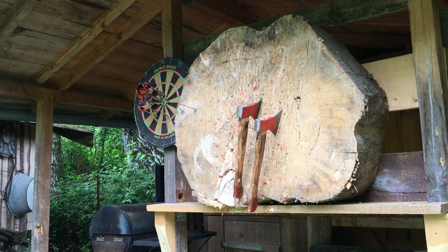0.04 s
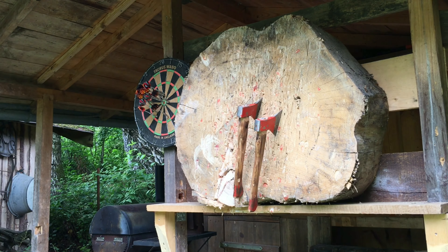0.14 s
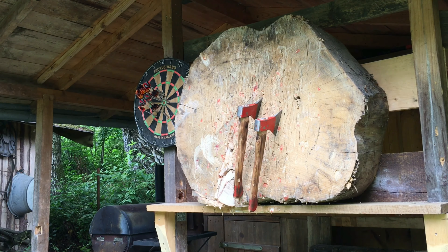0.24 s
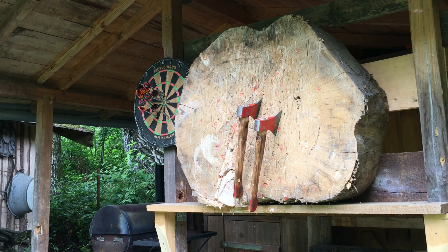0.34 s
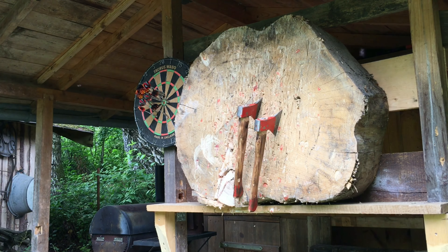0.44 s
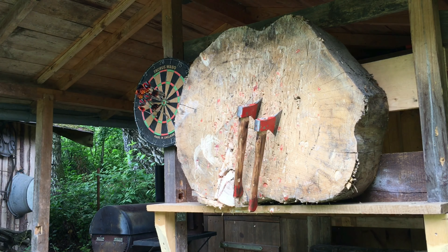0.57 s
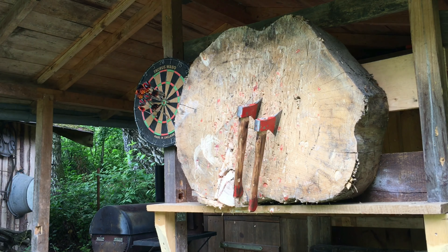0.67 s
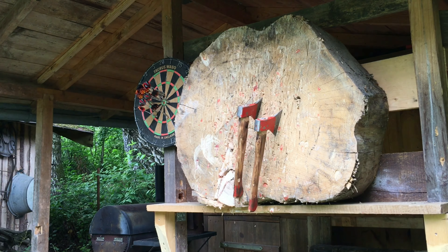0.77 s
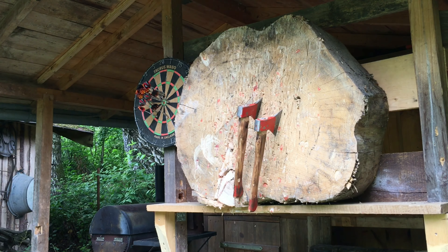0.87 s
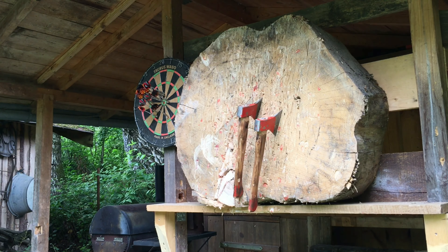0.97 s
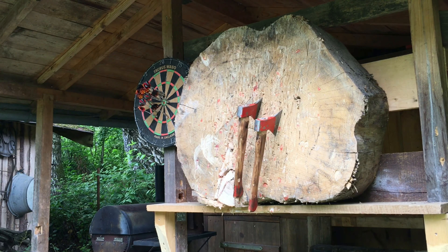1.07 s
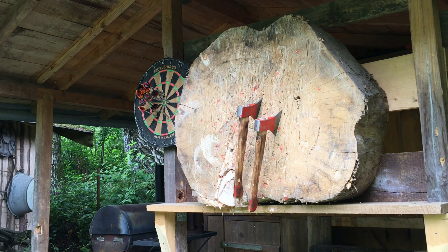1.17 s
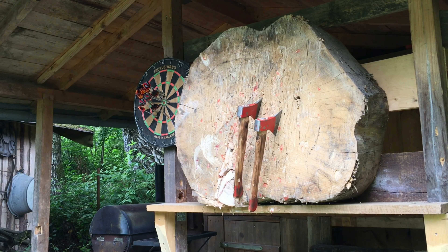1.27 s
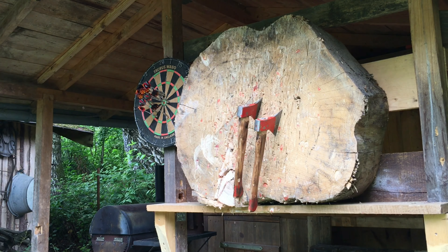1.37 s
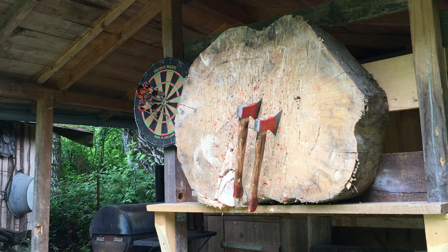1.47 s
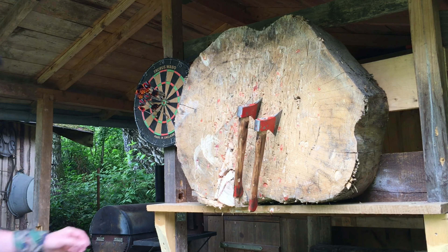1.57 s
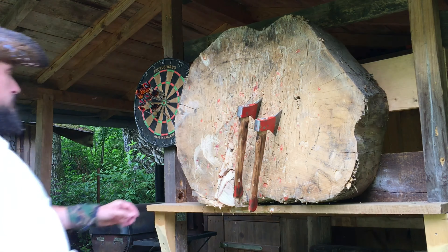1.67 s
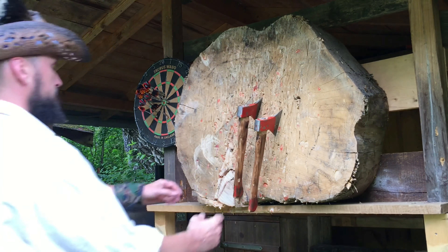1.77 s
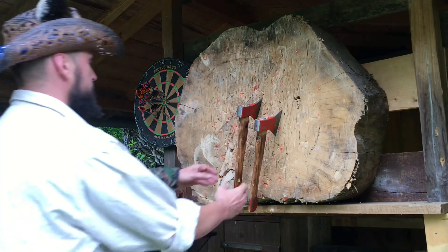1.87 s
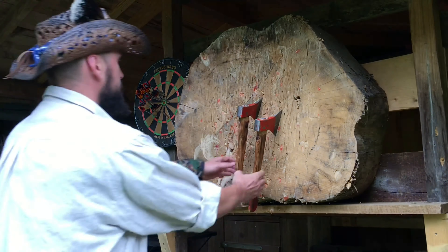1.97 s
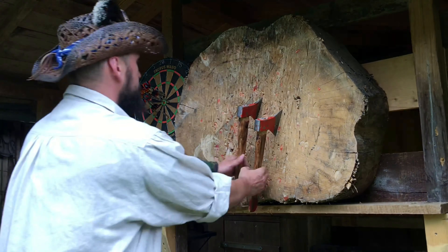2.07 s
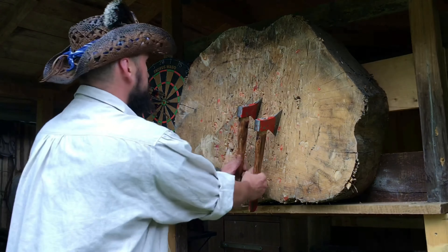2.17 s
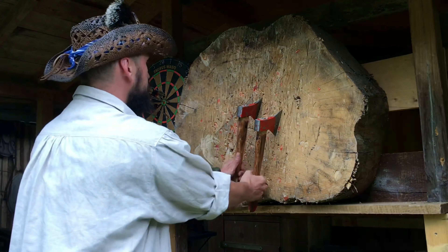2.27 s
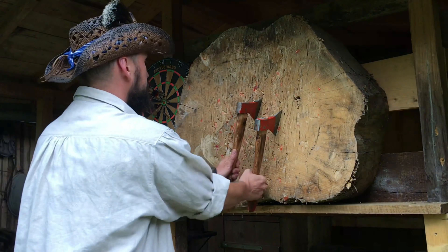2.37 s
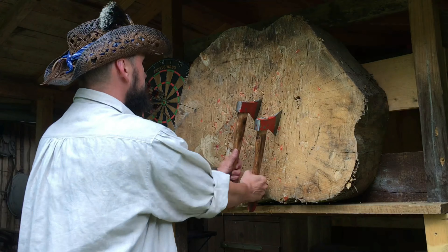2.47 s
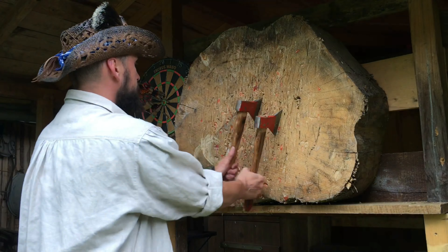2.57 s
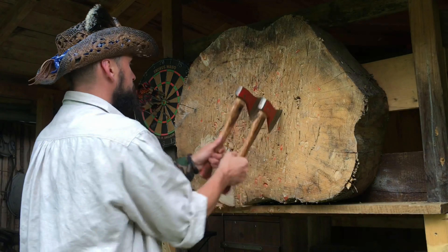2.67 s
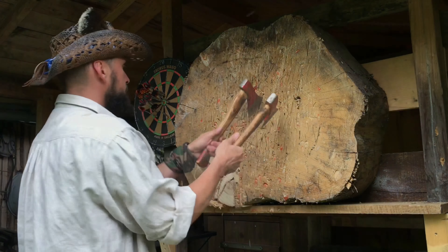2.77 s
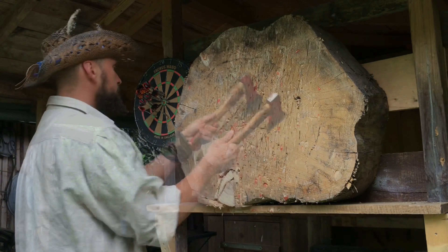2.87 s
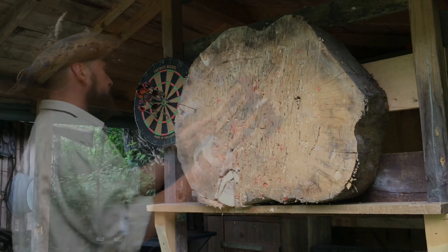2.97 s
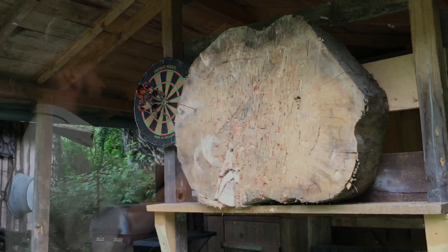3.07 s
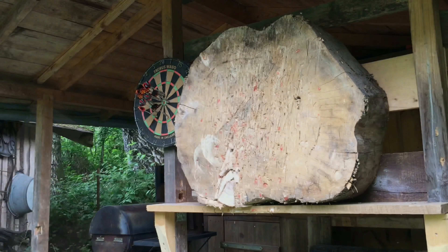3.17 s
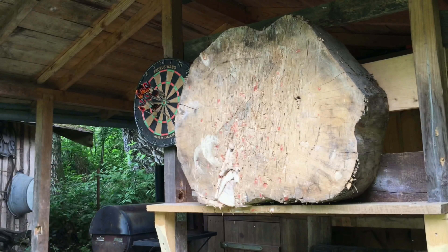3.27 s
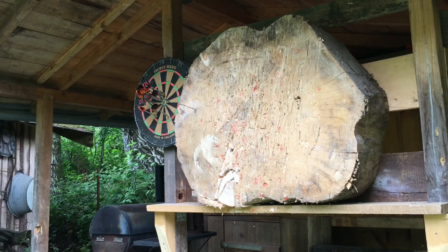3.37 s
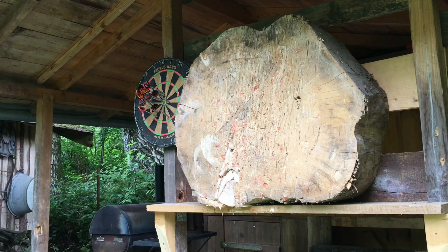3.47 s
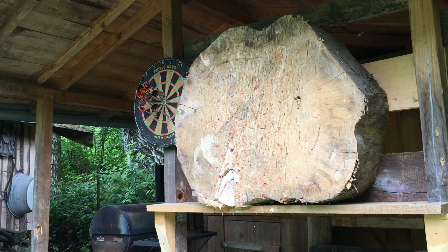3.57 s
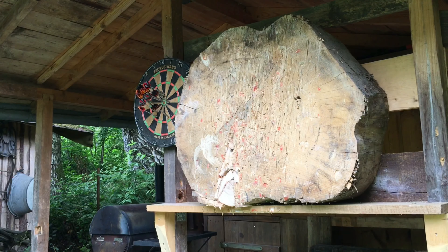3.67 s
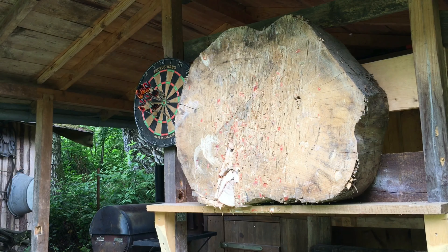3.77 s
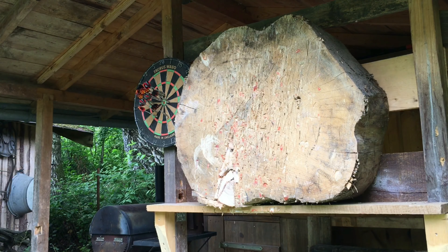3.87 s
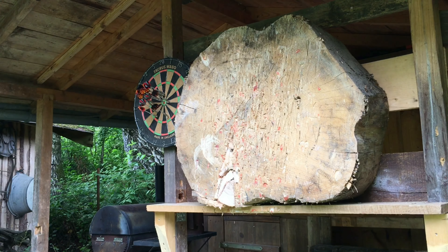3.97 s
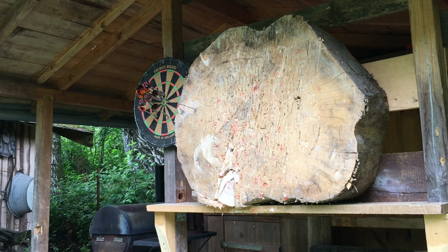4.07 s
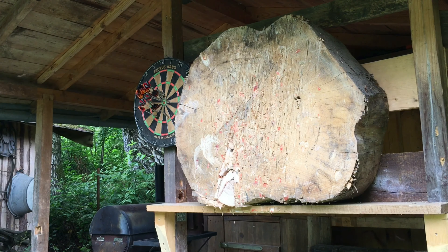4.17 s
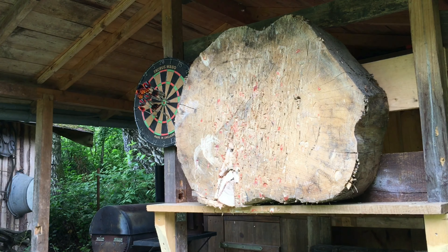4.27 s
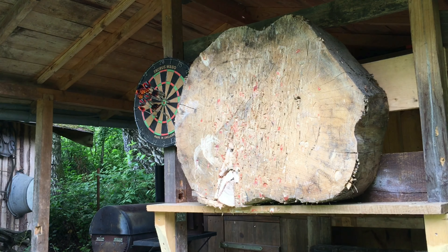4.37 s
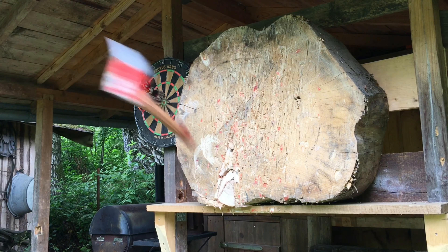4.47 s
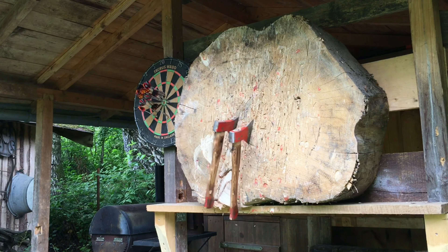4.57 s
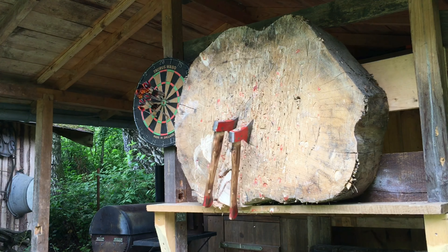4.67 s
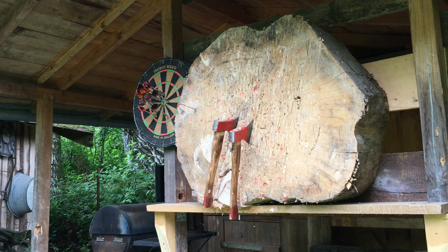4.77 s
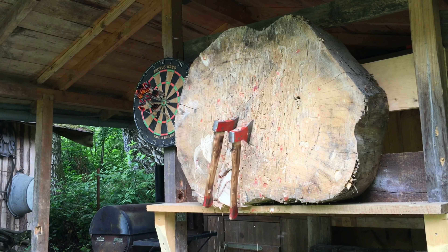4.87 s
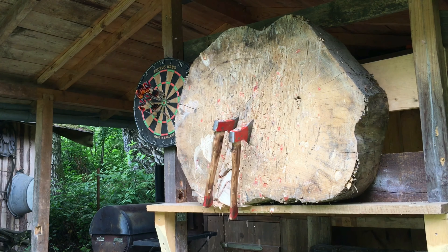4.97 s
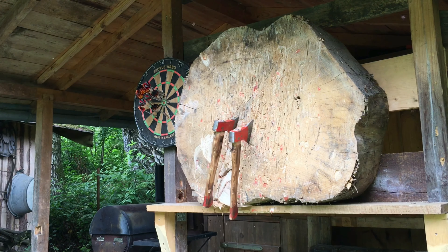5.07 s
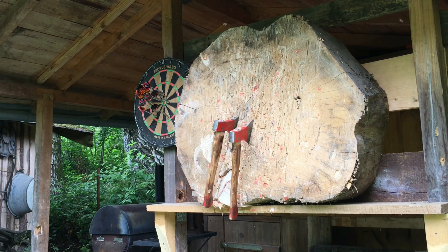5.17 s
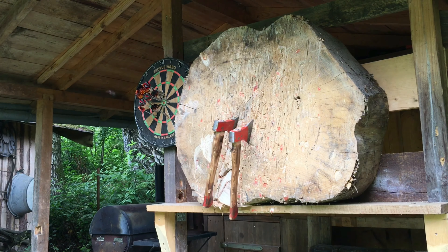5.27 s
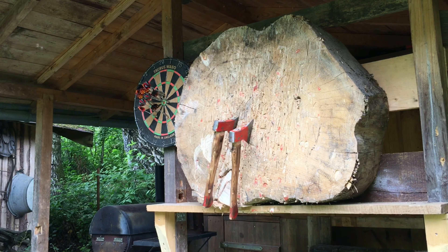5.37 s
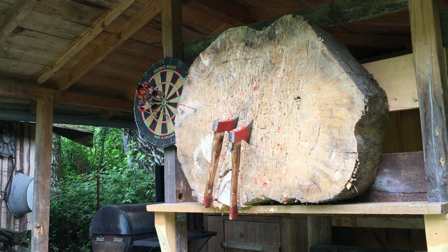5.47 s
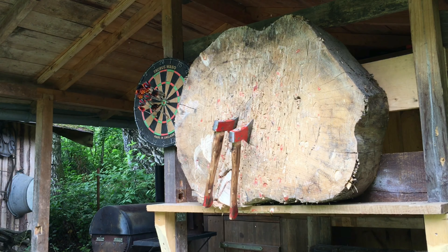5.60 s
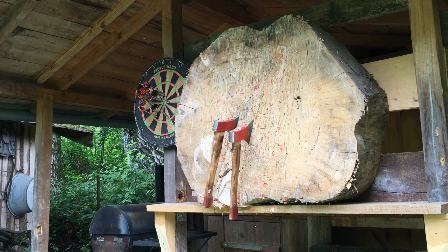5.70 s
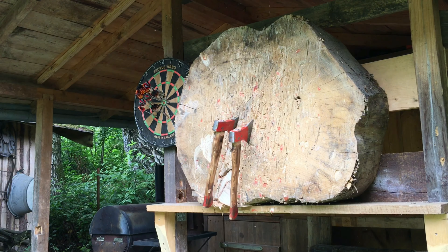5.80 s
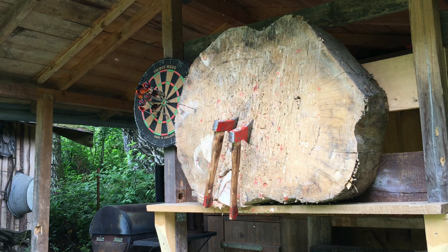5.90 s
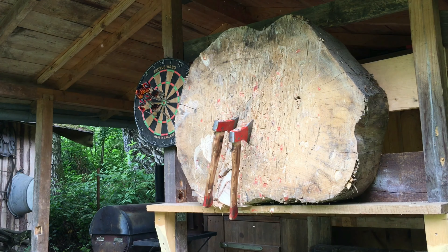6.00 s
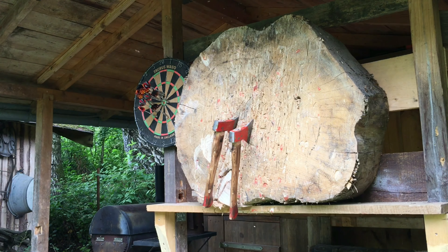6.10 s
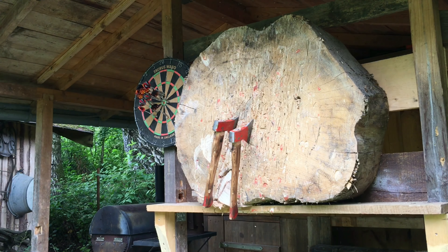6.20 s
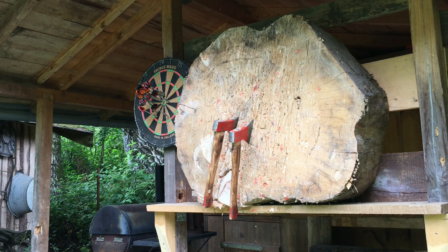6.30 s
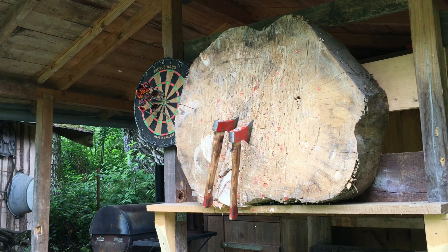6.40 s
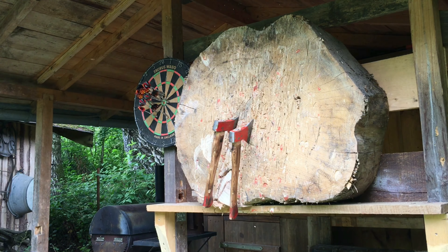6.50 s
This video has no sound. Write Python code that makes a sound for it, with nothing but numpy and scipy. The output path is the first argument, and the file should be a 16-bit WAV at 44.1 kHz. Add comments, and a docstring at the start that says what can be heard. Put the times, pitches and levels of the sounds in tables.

```python
"""Two thrown axes bite into a log slice under an open wooden shelter in a garden. First someone walks up, with
rustles and small ticks, and pulls the axes out; then birds whistle in the trees. A low rush of air leads to the
blow: sharp cracks of noise set the log's tones ringing, the stand booms and creaks as it rocks, and the
quivering handles give puffs of rubbing noise. Birds sing again and a small steel part clinks near the end. All
along lie a low far rumble, a low drone and a faint whine."""
import sys
import numpy as np
from scipy import signal
from scipy.fft import rfft, irfft
from scipy.io import wavfile

SR = 44100
rng = np.random.default_rng(int(sys.argv[2]) if len(sys.argv) > 2 else 0)


def wrap_up_sound(samples):
    """Save the sound to the file named by the first command line argument, as 16-bit audio."""
    columns = np.atleast_2d(samples).T
    # keep every value between -1 and 1, then stretch to whole-number steps
    tamed = np.clip(columns, -1, 1)
    steps = np.round(tamed * 32767).astype(np.int16)
    wavfile.write(sys.argv[1], SR, steps)


N = 288546   # length of the scene in samples


def from_db(db):
    """Turn decibels into a plain gain."""
    return 10 ** (np.asarray(db) / 20)


def rms_one(x):
    """Scale a signal to an rms of 1."""
    return x / np.sqrt(np.mean(x ** 2) + 1e-20)


def at_hz(points, hz):
    """Read a table between its points, along a logarithmic pitch axis."""
    points = np.array(points)
    return np.interp(np.log(hz + 1), np.log(points[:, 0]), points[:, 1])


def coloured(x, spectrum, above_hz=0):
    """Shape a noise by a spectrum; what lies above above_hz has rms 1."""
    hz = np.fft.rfftfreq(len(x), 1 / SR)
    shaped = rfft(x) * from_db(at_hz(spectrum, hz))
    upper_part = irfft(shaped * (hz >= above_hz), len(x))
    return irfft(shaped, len(x)) / np.std(upper_part)


def band_pass(x, low_hz, high_hz):
    """Keep the part of a sound between two pitches."""
    return signal.sosfilt(signal.butter(2, [low_hz, high_hz], "band", fs=SR, output="sos"), x)


def ring(clicks, hz, t60):
    """A unit click sets a sine of height 1 ringing; it loses 60 dB in t60 seconds."""
    r = from_db(-60 / (t60 * SR))
    w = 2 * np.pi * hz / SR
    return signal.lfilter([0, np.sin(w)], [1, -2 * r * np.cos(w), r * r], clicks + 1e-18)


def waver(hz, width_hz, db):
    """A tone that is not quite steady: noise in a narrow resonance."""
    t60 = np.log(1000) / np.pi / width_hz
    return from_db(db) * rms_one(ring(rng.standard_normal(N), hz, t60))


def grainy(spread_db, per_s):
    """Noise whose level jumps from grain to grain."""
    grain = (np.arange(N) * per_s / SR).astype(int)
    level_db = spread_db * rng.standard_normal(N)[grain]
    return rng.standard_normal(N) * from_db(level_db)


def add(out, s, piece):
    """Mix a piece into a track from second s on."""
    i = round(s * SR)
    out[i:i + len(piece)] += piece[:N - i]


def puff(attack_s, decay_s):
    """An envelope of height 1 that swells and dies."""
    t = np.arange(SR // 4) / SR
    shape = (1 - np.exp(-t / attack_s)) * np.exp(-t / decay_s)
    return shape / shape.max()


def swell(s, rise_s, fall_s):
    """A gain that climbs to 1 at s and sinks again, both at a steady rate in dB, down to -120 dB."""
    t = np.arange(N) / SR - s
    return from_db(np.maximum(20 * np.minimum(t / rise_s, -t / fall_s), -120))


def together(gains):
    """Unrelated noises add in power."""
    return np.sqrt(sum(g ** 2 for g in gains))


def echoes(x, t60s, build_s):
    """Dense reflections: noise in half-octave bands, each dying at its own rate; energy 1."""
    t = np.arange(SR // 2) / SR
    tail = 0
    edges = 60 * 2 ** np.arange(0, 8.6, .5)
    for low, high in zip(edges, edges[1:]):
        band = band_pass(rng.standard_normal(len(t)), low, high)
        tail = tail + band * from_db(-60 * t / at_hz(t60s, np.sqrt(low * high)))
    tail = tail * (1 - np.exp(-t / build_s))
    return signal.fftconvolve(x, tail / np.sqrt(np.sum(tail ** 2)))[:N]


# colour of the far rumble and air: (pitch [Hz], relative level [dB])
AIR_COLOUR = [(15, -54), (25, -21), (36, -4), (60, 1), (80, -6.5), (226, -19.5), (330, -26.5), (378, -28),
              (617, -33), (726, -34.5), (809, -32.5), (2750, -42.5), (4240, -42.5), (14800, -54.5),
              (16500, -69)]
# a low steady drone: (pitch [Hz], rms level [dB])
LOW_DRONE = [(53.8, -54.5), (145.3, -66)]
AIR_DB = -52   # rms
WHINE_HZ, WHINE_DB = 627, -72.5


def garden():
    """Far rumble and air as shaped noise, a wavering low drone and a thin whine with a drifting phase."""
    air = from_db(AIR_DB) * coloured(rng.standard_normal(N), AIR_COLOUR)
    phase_drift = 1.5 * waver(1.8, 1.5, 0)
    whine = from_db(WHINE_DB) * np.sin(2 * np.pi * WHINE_HZ * np.arange(N) / SR + phase_drift)
    drone = sum(waver(hz, 2.2, db) for hz, db in LOW_DRONE)
    return air + drone + whine


# bird notes: (time [s], length [s], start pitch [Hz], end pitch [Hz], level [dB], hoarseness [Hz])
BIRD_NOTES = [(2.733, 0.045, 8550, 8550, -72, 20), (2.74, 0.05, 5040, 4950, -74, 20),
              (2.785, .03, 4700, 4400, -72, 150), (2.925, 0.073, 4310, 2900, -67, 390),
              (3.075, 0.094, 6060, 4600, -77, 200), (3.195, 0.029, 8920, 8850, -80, 23),
              (3.202, 0.21, 3190, 3290, -86, 140), (3.491, 0.093, 3860, 3300, -77, 500),
              (3.468, 0.056, 8100, 8400, -83, 220), (3.578, 0.062, 7100, 6720, -72.5, 130),
              (3.59, 0.17, 8050, 7700, -81, 140), (3.67, 0.087, 4710, 4855, -69.5, 73),
              (3.986, .1, 3940, 3970, -72.5, 115), (4.075, 0.15, 4400, 4200, -72, 220),
              (4.26, 0.076, 6500, 6450, -76.5, 170), (5.138, .036, 3500, 7160, -59, 260),
              (5.151, 0.037, 3250, 6340, -47.5, 45), (5.172, 0.026, 2800, 6320, -58, 150),
              (6.131, 0.048, 3300, 6430, -61.5, 690), (6.166, 0.043, 4520, 6770, -54.5, 450),
              (6.258, .04, 3540, 5600, -57, 600), (6.275, .05, 4200, 6220, -61, 610),
              (6.432, 0.036, 3280, 5200, -61.5, 630), (6.449, 0.052, 4000, 6120, -61, 503),
              (5.14, 0.036, 6600, 9500, -60.5, 900), (5.141, .04, 2380, 3000, -67, 214)]
OVERTONE_DB, TREES_T60_S, TREES_DB = -26.5, .35, 1


def birds():
    """Whistles whose glide slows towards its end, smeared by the trees."""
    out = np.zeros(N)
    wobble = rms_one(signal.lfilter([1], [1, -.97], rng.standard_normal((len(BIRD_NOTES), SR // 4))))
    for (s, length, start_hz, end_hz, db, hoarse_hz), shake in zip(BIRD_NOTES, wobble):
        u = np.linspace(0, 1, round(length * SR))   # 0 to 1 through the note
        glide_hz = start_hz + (end_hz - start_hz) * np.sin(u * np.pi / 2)
        hz = glide_hz + hoarse_hz * shake[:len(u)]
        phase = 2 * np.pi * np.cumsum(hz) / SR
        lateness = 1 + 0.36 * abs(end_hz - start_hz) / 1000   # wide sweeps are loudest nearer their end
        loudness = np.sin(np.pi * u ** lateness) ** 0.29
        whistle = np.sin(phase) + from_db(OVERTONE_DB) * np.sin(2 * phase)
        add(out, s, from_db(db) * loudness * whistle)
    trees = echoes(out, [(100, TREES_T60_S), (9000, TREES_T60_S)], build_s=0.0046)
    return out + from_db(TREES_DB) * trees


# steps, cloth and hands: (loudest time [s], time to gain 20 dB [s], time to lose 20 dB [s],
# crisp level [dB], middle level [dB], dull level [dB])
MOVES = [(.03, .1, .3, -78, -80, -80), (.18, .2, .15, -80, -68, -73), (.436, .12, .06, -80, -69, -68),
         (.645, .06, .25, -71, -67, -74), (.762, .1, .07, -64, -66, -74), (.96, .15, .2, -74, -68, -72),
         (1.1, .01, .06, -71, -61, -68), (1.325, .04, .3, -74, -73, -73), (1.59, .05, .06, -68, -71, -73),
         (1.625, .02, .3, -74, -70, -65), (1.85, .02, .05, -82, -68, -69), (2.11, .4, .3, -72, -75, -71),
         (2.23, .2, .03, -73, -80, -80), (2.256, .015, .03, -64, -62, -59),
         (2.333, .02, .11, -63, -50, -47), (2.52, .15, .04, -70, -75, -79),
         (2.585, .015, .11, -70, -56, -51), (2.63, .05, .4, -69, -74, -70),
         (2.748, .02, .03, -71, -70, -70), (3.893, .01, .15, -73, -66, -69), (4.02, .2, .3, -81, -74, -76),
         (4.195, .08, .07, -64, -63, -67), (4.43, .2, .3, -95, -67, -58), (5.06, .1, .12, -70, -73, -60),
         (5.17, .08, .2, -70, -68, -64), (5.36, .02, .1, -71, -81, -75), (5.91, .02, .06, -79, -72, -80),
         (6.25, .08, .3, -72, -70, -72)]
# colours of the crisp, middle and dull parts: (pitch [Hz], relative level [dB])
LEAVES_COLOUR = [(2060, -26), (3500, -0.5), (4840, -1.5), (5810, 0), (11900, -2), (15400, -6.5),
                 (16200, -14), (16500, -40)]
CLOTH_COLOUR = [(900, -22), (1300, -2), (2000, -1), (3300, -10.5), (4800, -23)]
SCUFF_COLOUR = [(120, -50), (220, -1.5), (550, -1.5), (1100, -6.5), (1600, -30)]
# a quiet stir while someone is near, then a short fade: crisp, middle and dull levels
MOVING_UNTIL_S, MOVING_DB = 2.72, (-86, -79, -81)


def rustle():
    """Many small rubs: crisp grains above, a brushing in the middle, a dull scuff below."""
    near = np.clip((MOVING_UNTIL_S - np.arange(N) / SR) / .15 + 1, 0, 1)
    moves = [from_db(db)[:, None] * swell(s, rise_s, fall_s) for s, rise_s, fall_s, *db in MOVES]
    stir = from_db(MOVING_DB)[:, None] * near
    crisp, brush, dull = together(moves + [stir])
    out = crisp * coloured(grainy(2.7, 700), LEAVES_COLOUR, above_hz=9400)
    out = out + brush * coloured(grainy(2.5, 400), CLOTH_COLOUR)
    return out + dull * coloured(grainy(2.4, 200), SCUFF_COLOUR)


# small ticks and snaps of wood, twigs and steel:
# (time [s], ring level [dB], ring pitch [Hz], t60 of the lowest partial [s], level of the noise fed to the snap [dB])
SMALL_TICKS = [(.385, -50, 1210, 0.018, -75), (.432, -58, 1500, .012, -70), (.614, -70, 9000, .008, -54),
               (0.638, -60, 1540, 0.0087, -48), (0.984, -50, 1660, 0.015, -61), (1.057, -53, 880, .02, -65),
               (1.092, -39.5, 1130, 0.023, -42), (1.316, -53, 1620, 0.0074, -49.5),
               (1.618, -51, 696, .012, -52), (1.829, -37, 1290, 0.014, -70),
               (2.254, -49.5, 1170, 0.019, -48), (2.307, -50, 1510, 0.026, -62),
               (2.313, -41, 1320, 0.023, -45), (2.319, -34.5, 940, 0.022, -45),
               (2.3263, -33.5, 474, 0.065, -21.5), (2.327, -26.5, 3430, 0.0076, -42),
               (2.572, -42, 520, 0.052, -38.5), (2.617, -52, 12000, .008, -56),
               (2.747, -52.5, 3110, 0.026, -68), (3.079, -62, 5960, 0.0097, -58),
               (3.892, -62, 910, .015, -58), (4.168, -50, 2290, 0.015, -52),
               (5.011, -53.5, 2500, 0.046, -66), (5.022, -56, 2900, 0.045, -67),
               (5.035, -55, 2210, .04, -68), (2.593, -45, 1310, 0.013, -56),
               (5.227, -40, 9000, 0.0057, -46)]
# partials of each tick: (multiple of the ring pitch [1], level against the ring level [dB])
PARTIALS = [(1, 1.5), (1.75, -5.5), (2.4, -5), (4.3, -10)]


def ticks():
    """A short, rough ring whose upper partials die faster, plus a bright snap."""
    out = np.zeros(N)
    t = np.arange(SR // 8) / SR
    noise = rng.standard_normal((len(SMALL_TICKS), len(t)))
    snaps = band_pass(noise, 2500, 11000)
    for (s, db, hz, t60, snap_db), snap, rough in zip(SMALL_TICKS, snaps, noise):
        phase = 2 * np.pi * hz * t + 0.38 * np.cumsum(rough) * np.sqrt(hz / SR)
        body = np.zeros(len(t))
        for k, k_db in PARTIALS:
            if k * hz < SR / 2:
                body += np.sin(k * phase) * from_db(db + k_db - 60 * np.sqrt(k) * t / t60)
        soft_start = 1 - np.exp(-t / 0.00032)
        add(out, s, body * soft_start + from_db(snap_db) * snap * np.exp(-t / 0.0015))
    return out


# taps on a small steel part: (time [s], level [dB])
STEEL_TAPS = [(5.3468, -42)]
# its tones: (pitch [Hz], level against the tap [dB], t60 [s])
STEEL_TONES = [(2510, -17, 0.059), (5500, -11, 0.038), (8250, -3.5, .03), (9260, 1.5, .015),
               (11760, 5.5, 0.014), (14600, 3, 0.013)]


def clink():
    """A tap sets a few short steel tones ringing."""
    tap = np.zeros(N)
    for s, db in STEEL_TAPS:
        tap[round(s * SR)] = from_db(db)
    return sum(from_db(db) * ring(tap, hz, t60) for hz, db, t60 in STEEL_TONES)


# air pushed by the throwing arms and the flying axes:
# (loudest time [s], level [dB], time to gain 20 dB [s], time to lose 20 dB [s])
AIR_RUSHES = [(4.1, -48, .03, .05), (4.41, -46, .16, .5)]
# colour of the rush: (pitch [Hz], relative level [dB])
RUSH_COLOUR = [(35, -32.5), (60, 2.5), (204, -3), (243, -17.5), (301, -12), (700, -30.5), (910, -56),
               (1540, -120)]


def throw():
    """A low rush of air, made of shaped noise, that stops when the blades land."""
    flying = np.arange(N) / SR < BLADE_CONTACTS[0][0]
    rush = sum(from_db(db) * swell(s, rise_s, fall_s) for s, db, rise_s, fall_s in AIR_RUSHES)
    return flying * rush * coloured(rng.standard_normal(N), RUSH_COLOUR)


# quivering handles rub in their cuts, one puff a swing: (first time [s], swings [count], period [s],
# delay times the swing number squared [s], first level [dB], loss per swing [dB])
HANDLE_QUIVERS = [(4.573, 7, .0447, .0001, -54, .1), (4.893, 6, .024, .0024, -60, 1.5)]
# colour of the rubbing: (pitch [Hz], relative level [dB])
RUB_COLOUR = [(3820, -14.5), (6500, -8), (10300, -3), (11600, -1.5), (14600, -0.5), (16200, -8),
              (16500, -45)]


def handles():
    """The quivering handles give bright puffs of friction that come slower and weaker."""
    swings = np.zeros(N)
    for s, count, period_s, slowing_s, db, loss_db in HANDLE_QUIVERS:
        for k in range(round(count)):
            start_s = s + k * period_s + k * k * slowing_s
            add(swings, start_s, from_db(db - k * loss_db) * puff(attack_s=0.00416, decay_s=0.02144))
    return swings * coloured(grainy(1.16, 820), RUB_COLOUR)


# the stand jolts at the blow, then rocks back on its feet:
# (loudest time [s], boom level [dB], creak level [dB], time to lose 20 dB [s])
STAND_ROCKS = [(4.556, -19, -29, .2), (4.68, -32, -39, .4), (4.892, -31, -44, .12), (5.0, -37, -48, .3),
               (5.19, -39, -54, .07), (5.32, -43, -55, .4)]
# colours of the boom and the creak: (pitch [Hz], relative level [dB])
BOOM_COLOUR = [(15, -39.5), (25, -8.5), (38, -6), (58, 1.5), (97, -9.5), (130, -19.5), (170, -43),
               (290, -120)]
CREAK_COLOUR = [(65, -24), (110, -4), (189, -4.5), (261, -3.5), (401, -13), (607, -13.5), (736, -19.5),
                (5000, -38), (6500, -38), (11000, -120)]
ROCK_RISE_S = .04   # time to gain 20 dB


def stand():
    """The frame under the log booms and creaks each time it rocks."""
    rocks = [from_db([[boom_db], [creak_db]]) * swell(s, ROCK_RISE_S, fall_s)
             for s, boom_db, creak_db, fall_s in STAND_ROCKS]
    boom, creak = together(rocks)
    boom_sound = boom * coloured(rng.standard_normal(N), BOOM_COLOUR)
    return boom_sound + creak * coloured(grainy(1.8, 120), CREAK_COLOUR)


# blade contacts: (time [s], crack level [dB], crack pitch [Hz],
# typical push into the log [dB], softness: low-pass pitch [Hz])
BLADE_CONTACTS = [(4.532, -5, 1920, -17.5, 3916), (4.5375, -7.5, 2392, -20.5, 4007),
                  (4.5432, -7.5, 7434, -11.5, 2004), (4.5476, -6.5, 12000, -10, 1500),
                  (4.552, -8, 604, -5.5, 815), (4.557, -16, 616, -11, 796), (4.563, -14.5, 560, -10.5, 800)]
# tones of the log slice: (pitch [Hz], level [dB], t60 before the blades shorten it [s])
LOG_TONES = [(277.6, -16, 0.3), (329.8, -13, 0.21), (376, -6, 0.19), (400, -7.5, 0.14),
             (520.7, -0.5, 0.062), (553.6, -14.5, 0.21), (597.6, -6, 0.15), (671.6, -12.5, 0.084),
             (743, -18.5, 0.047), (768, -13, 0.22), (880, -27, 0.11), (982, -19.5, 0.18), (1017, -24, 0.18),
             (1242, -13, 0.094), (1276, -25.5, 0.075), (1473, -16.5, 0.14), (1520, -29, 0.19),
             (1760, -31, 0.32), (1740, -31, 0.29), (1950, -24, 0.22), (2080, -37, 0.24),
             (2480, -26.5, 0.14), (2310, -38, 0.24), (2820, -39.5, 0.2)]
# colour of the splitting fibres: (pitch [Hz], relative level [dB])
CRACK_COLOUR = [(290, -35), (500, -3), (1410, 1.5), (1920, -6), (2190, -7), (3450, -11), (9890, -27),
                (11400, -19.5), (15800, -30.5), (16500, -48)]
CRACK_DECAY_S = 0.0026
WEDGE = 0.68   # share of each ring time left with the blades stuck in the wood


def axes():
    """Each contact splits fibres with a short crack and pushes every tone of the log, unevenly."""
    crack = np.zeros(N)
    push = np.zeros((len(LOG_TONES), N))
    noise = rng.standard_normal((len(BLADE_CONTACTS), SR // 4))
    uneven_db = rng.normal(0, 2.5, (len(BLADE_CONTACTS), len(LOG_TONES)))
    for (s, crack_db, crack_hz, push_db, soft_hz), white, uneven in zip(BLADE_CONTACTS, noise, uneven_db):
        pitch = band_pass(white, crack_hz * 0.66, crack_hz * 1.25)
        split = coloured(white, CRACK_COLOUR) + 0.58 * rms_one(pitch)   # the split favours one pitch
        add(crack, s, from_db(crack_db) * puff(0.00043, CRACK_DECAY_S) * rms_one(split))
        # a soft contact drives the high tones less
        soft = 1 / np.sqrt(1 + (np.array(LOG_TONES)[:, 0] / soft_hz) ** 4)
        push[:, round(s * SR)] = from_db(push_db + uneven) * soft
    log = sum(from_db(db) * ring(p, hz, t60 * WEDGE) for p, (hz, db, t60) in zip(push, LOG_TONES))
    return crack + log


# how long shelter and trees answer each knock: (pitch [Hz], t60 [s])
SHELTER_T60 = [(100, 0.52), (300, 0.12), (700, .17), (2000, 0.14), (5000, .15), (12000, 0.12)]
BLOW_ECHO_DB, TICK_ECHO_DB = -7.5, -11   # levels sent into the echoes
WALL_HZ = 8850   # low-pass of the boards


def scene():
    """Blow and small knocks with the shelter's answer, mixed with all the other sounds."""
    blow = axes()
    small = ticks() + clink()
    knocks = from_db(BLOW_ECHO_DB) * blow + from_db(TICK_ECHO_DB) * small
    answer = echoes(knocks, SHELTER_T60, build_s=.004)
    answer = signal.lfilter(*signal.butter(1, WALL_HZ, fs=SR), answer)   # rough boards swallow treble
    mix = blow + small + answer + throw() + stand() + handles() + rustle() + birds() + garden()
    return mix[None]   # one channel


# dips in the microphone's response: (pitch [Hz], width [Hz], share removed [0 to 1])
RESPONSE_DIPS = [(4810, 370, .3), (10560, 300, .4)]
MIC_LOW_HZ, CUTOFF_HZ = 43, 16000


def record(dry):
    """The microphone drops the deepest bass and has two dips; peaks are rounded, the top is cut."""
    thin = signal.sosfilt(signal.butter(3, MIC_LOW_HZ, "high", fs=SR, output="sos"), dry)
    for hz, width_hz, share in RESPONSE_DIPS:
        around_dip = signal.lfilter(*signal.iirpeak(hz, hz / width_hz, SR), thin)
        thin = thin - np.clip(share, 0, 1) * around_dip
    rounded = thin / (1 + np.abs(thin) ** 4) ** .25
    return signal.sosfilt(signal.ellip(12, .5, 90, CUTOFF_HZ, fs=SR, output="sos"), rounded)


dry = scene()
out = record(dry)
wrap_up_sound(out)
```